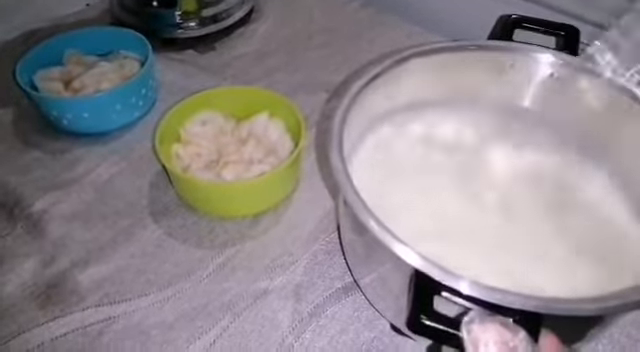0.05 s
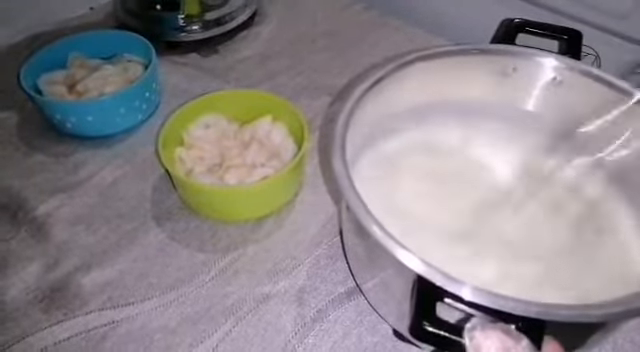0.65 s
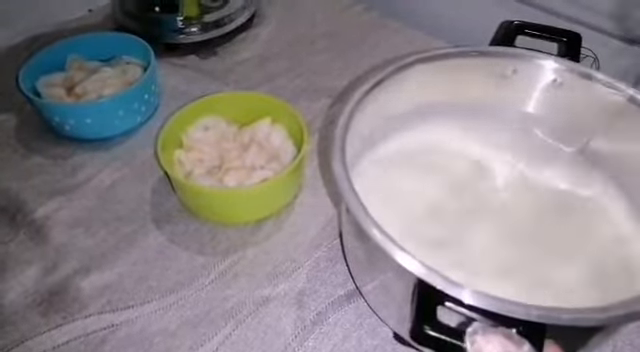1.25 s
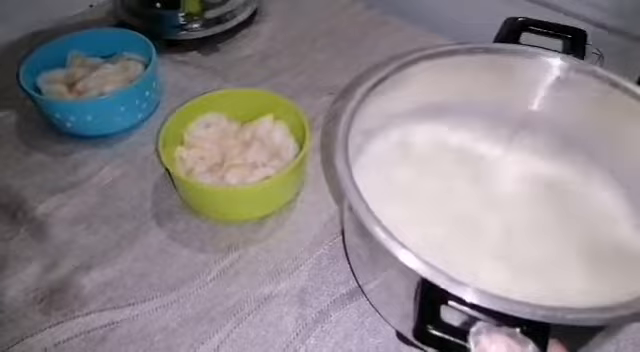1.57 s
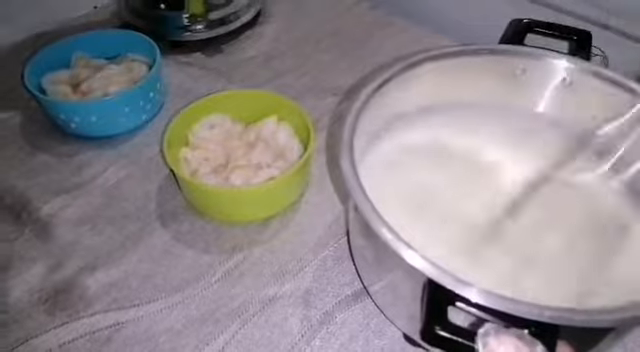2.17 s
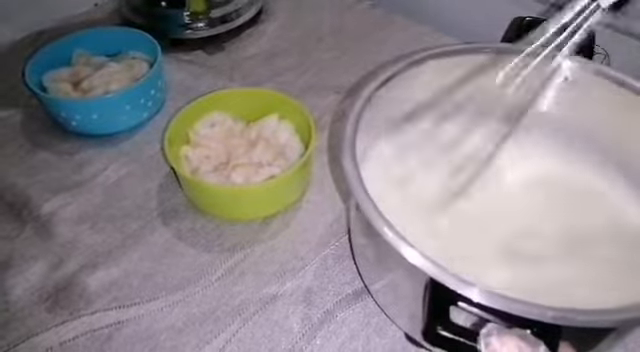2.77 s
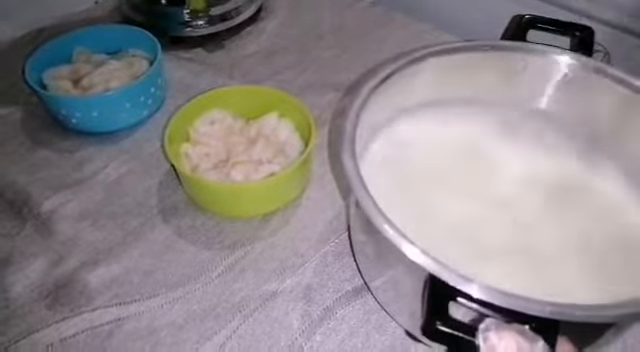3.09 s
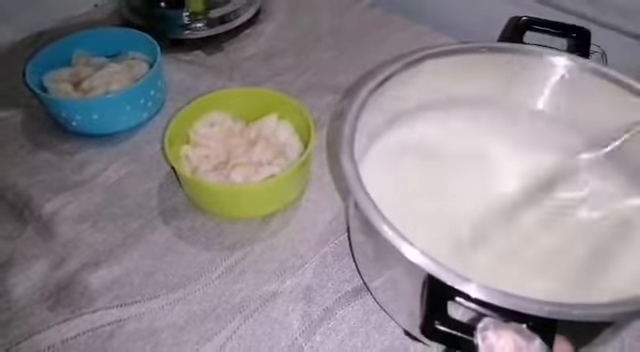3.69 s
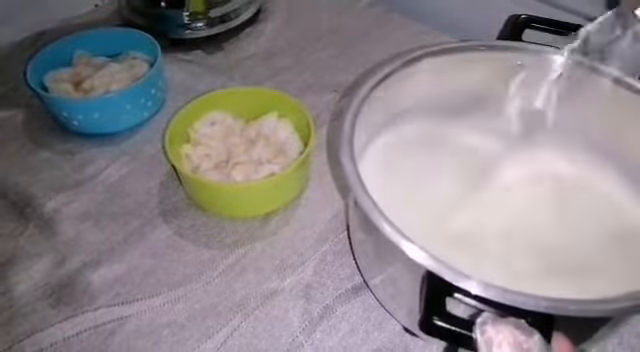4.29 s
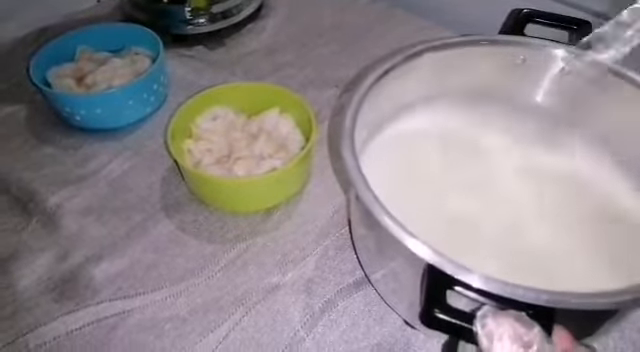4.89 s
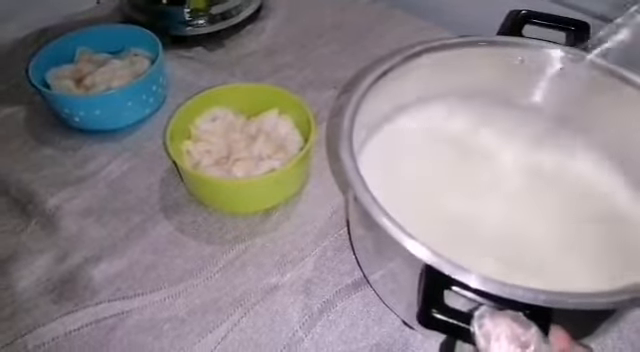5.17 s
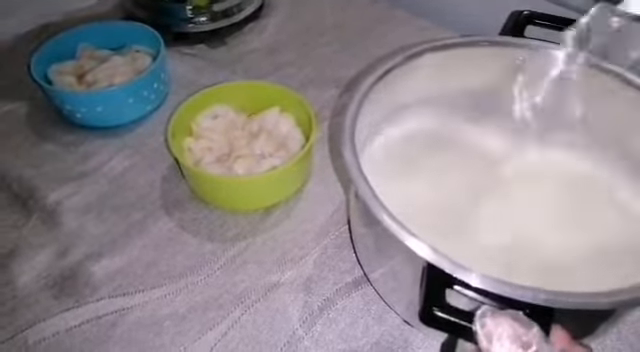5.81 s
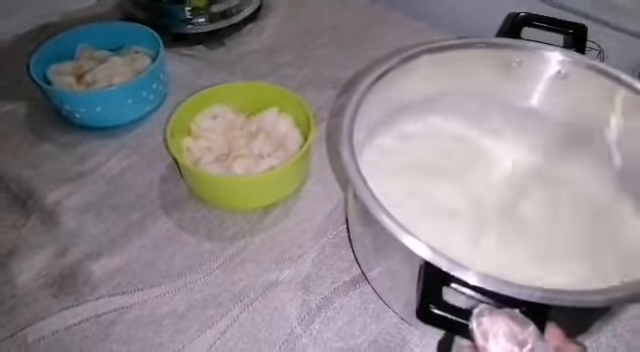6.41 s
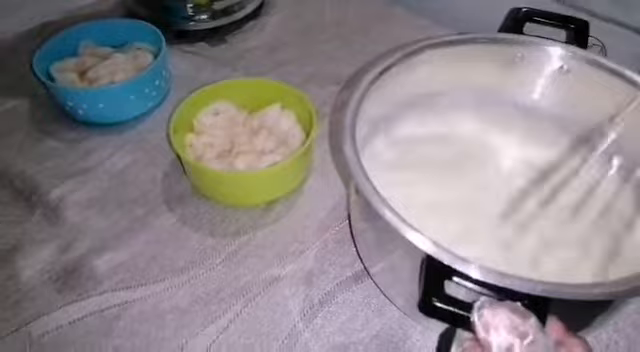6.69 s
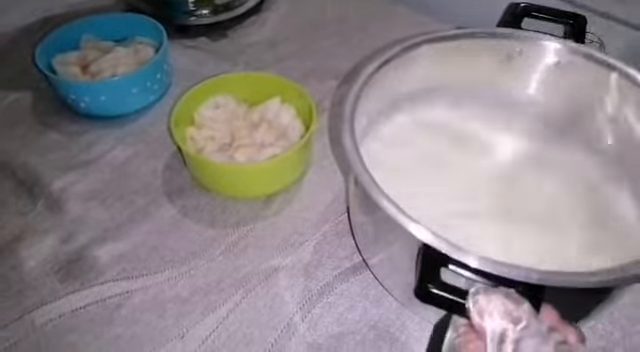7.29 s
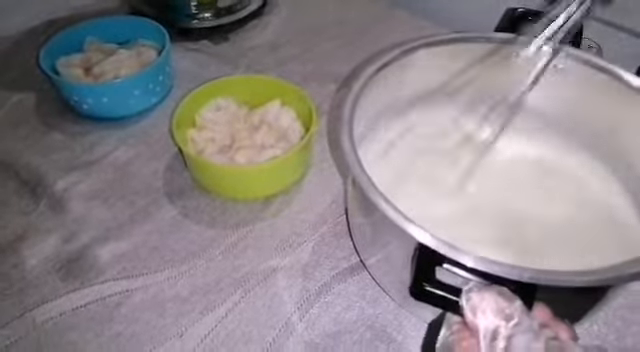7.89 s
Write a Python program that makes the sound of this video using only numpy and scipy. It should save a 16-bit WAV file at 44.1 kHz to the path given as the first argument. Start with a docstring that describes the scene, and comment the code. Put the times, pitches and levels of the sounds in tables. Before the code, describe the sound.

A wire whisk stirs milk in a steel pot throughout, heard close in a small kitchen over a faint appliance hum. It circles nearly four times a second. On each turn the wires brush the wall, then strike it in a tiny clatter, leaving a bright, short metallic ring, and a soft wave of milk follows with gurgles and little plops. The ticks are sharpest in the first 1.5 seconds, soften briefly near 2 seconds, then return in a steady rhythm. From about 3.5 seconds the milk gulps with a slightly deeper, hollow body, and around 5 seconds the strikes ease off for a moment. At about 6 seconds the wires scrape along the steel and the strokes grow uneven, with scattered clicks while the milk churns thickly. A last clatter comes at about 8 seconds.

```python
"""A wire whisk stirs milk in a steel pot, nearly four turns a second, in a small kitchen.
An appliance hums faintly throughout. In each turn the wires first brush the wall, then strike it one
after another, exciting the modes of wires and pot. While these ring on, the whisk drags a wave through
the milk, whose bubbles and air pockets resonate in the hollow of the pot. From about 3.5 s the body of
milk booms more strongly; after 6 s the strokes grow uneven and the milk churns thickly."""
import sys
import numpy as np
from scipy import signal
from scipy.fft import rfft, irfft
from scipy.io import wavfile
from scipy.ndimage import uniform_filter1d

SR = 44100
rng = np.random.default_rng(int(sys.argv[2]) if len(sys.argv) > 2 else 0)


def to_wav(s):
    """Save 16-bit WAV."""
    ch = np.atleast_2d(s).T  # columns
    pcm = np.round(np.clip(ch, -1, 1) * 32767)  # PCM
    wavfile.write(sys.argv[1], SR, pcm.astype(np.int16))


N = 355005
TIME = np.arange(N) / SR
BRUSH_LEAD_S = 0.019  # the wires brush the wall this long before each blow

# Levels in the tables are relative; the gains of the mix follow.
# Strokes of the whisk: t/s, blow level/dB, left minus right/dB, clatter length/s, knock re blow/dB,
# ping re blow/dB, lag of the wave/s, wave level/dB, gulp level/dB
STROKES = [(0.1637, -19, 1.5, 0.0034, 2.5, -2.5, 0.1, -43, -62.5),
           (0.413, -21.5, 0, 0.019, -20, -3, .11, -38, -52.5),
           (0.661, -19.5, 2, 0.0094, -33, -11, 0.11, -45, -59),
           (0.927, -21.5, 3.5, 0.012, -20, 1.5, 0.11, -44, -64),
           (1.211, -26.5, 6, 0.004, -22, 1, 0.078, -45.5, -62),
           (1.4572, -24.5, -1, 0.011, -17, -14, 0.075, -48.5, -69),
           (1.727, -43, 3, 0.0073, 0, -20, 0.05, -43, -60),
           (1.979, -51, 0, .0066, -14, -14, 0.061, -39.5, -58),
           (2.21, -27, -2.5, 0.032, 2, -20, 0.07, -38.5, -52.5),
           (2.4456, -25, -2, 0.023, -7, -22, 0.09, -39.5, -55.5),
           (2.687, -26, -2, 0.03, -4, -16, 0.091, -43, -65.5),
           (2.936, -27, 1.5, 0.042, -2, -18, 0.09, -43, -57),
           (3.203, -24, 2, 0.019, -4, -5, 0.091, -42, -73),
           (3.463, -29, 0.5, 0.035, -6, -12, 0.083, -40.5, -56),
           (3.732, -34.5, 6, 0.015, 1, -8, 0.075, -41, -60),
           (3.98, -26, 0, 0.016, -4, -7, 0.081, -41.5, -63),
           (4.2425, -27.5, 2.5, 0.018, -18, -10, 0.071, -42.5, -59.5),
           (4.4958, -23.5, 0, 0.019, -3, -20, 0.096, -44.5, -62),
           (4.7716, -28, 4, 0.0085, -10, -8, 0.073, -38.5, -58.5),
           (5.048, -42, 5, 0.0056, 9, -21, 0.067, -38, -57),
           (5.315, -50, 8, 0.0051, 13.5, -22, 0.052, -37.5, -53.5),
           (5.5588, -30, -0.5, 0.0096, 5.5, -16, 0.06, -38, -67),
           (5.781, -30, 0.5, 0.026, 0, -29, 0.1, -45, -73),
           (6.029, -26, 5, 0.012, -12, -13, 0.023, -37, -81),
           (6.178, -34, -14, 0.0076, 1, -6, 0.17, -43.5, -69),
           (6.378, -25, -1.5, 0.031, -19, -19, 0.033, -49, -63.5),
           (6.592, -59, 0, .008, -14, -14, 0.03, -41, -57.5),
           (6.673, -28.5, -5, 0.036, -23, 2, 0.0084, -37.5, -63),
           (6.964, -28, -5.5, 0.0067, -4, -5.5, 0.15, -50.5, -57.5),
           (7.241, -24.5, 1.5, 0.012, -19, -10, 0.16, -53, -65),
           (7.522, -34.5, -2, 0.016, -2, -20, 0.15, -77, -67),
           (7.7, -67, -2, .008, -14, -14, 0.054, -46.5, -63.5),
           (7.96, -73, -4, .008, -17, -12, 0.033, -49, -54.5),
           (8.012, -29, -3.5, .13, -20, -16, 0.034, -54, -56)]
# Wires sliding along the steel: middle t/s, length/s, level/dB
SCRAPES = [(0.01, 0.13, -45), (0.139, 0.061, -47.5), (1.274, 0.031, -46), (6.055, 0.035, -42),
           (6.175, 0.079, -42.5), (6.24, 0.024, -43.5), (6.402, 0.26, -56)]


def undb(db):
    """Amplitude ratio of a level in decibels."""
    return 10 ** (np.asarray(db) / 20)


def unit(x):
    """Normalisation to rms 1."""
    return x / np.sqrt(np.mean(x ** 2))


def fade(t, t60):
    """Exponential damping, 60 dB in t60 seconds."""
    return np.exp(-np.log(1000) * t / t60)


def add(track, s, sound):
    """Superposition of a sound on a track from time s."""
    i = max(int(s * SR), 0)
    room_left = max(N - i, 0)
    track[..., i:i + sound.shape[-1]] += sound[..., :room_left]


def panned(db, pan_db):
    """Level difference between the sides: gains for db + pan_db (left) and db - pan_db (right)."""
    return undb(db + pan_db * np.array([[1], [-1]]))


def through(x, response):
    """Convolution with an impulse response."""
    return signal.fftconvolve(np.atleast_2d(x), np.atleast_2d(response), axes=-1)[:, :N]


def colour(x, points, size=4096):
    """Minimum-phase filter of unit energy that follows points (f/Hz, level/dB)."""
    hz, db = np.transpose(points)
    grid = np.linspace(1, SR / 2, size // 2 + 1)
    cepstrum = irfft(np.log(undb(np.interp(np.log(grid), np.log(hz), db))))
    cepstrum[1:size // 2] *= 2
    cepstrum[size // 2 + 1:] = 0
    response = irfft(np.exp(rfft(cepstrum)))
    return through(x, response / np.linalg.norm(response))


def grit(spread_db):
    """Impulsive noise: tiny impacts of very uneven size, rms 1."""
    return unit(rng.standard_normal(N) * undb(spread_db * np.clip(rng.standard_normal(N), -2, 2)))


def pair(source, apart=1.0):
    """Partial coherence: two channels share one stream and each has a part of its own."""
    return unit(source() + apart * np.array([source(), source()]))


def swells(rows, skew=0.6):
    """Skewed Gaussian envelopes, quick to rise and slower to fall: rows (middle t/s, length/s, level/dB)."""
    t = TIME[::64]
    out = np.zeros(len(t))
    for s, length, db in rows:
        position = 2 * (t - s) / length + skew
        width = 1 + skew * np.sign(position)
        out += undb(db) * np.exp(-np.minimum((position / width) ** 2, 20))
    return np.interp(TIME, t, out)


def kitchen():
    """Background noise: broadband room air and the steady tones of an appliance."""
    # Spectrum of the room air: f/Hz, density level/dB
    air_spectrum = [(15, -49), (25, 1), (60, -9), (105, -0.5), (152, -4.5), (331, -9), (684, -25.5),
                    (1300, -33.5), (2300, -7), (6700, -23), (8810, -17), (11800, -38), (15500, -25.5)]
    # Appliance tones: f/Hz, rms level/dB
    hum_tones = [(120, -74.5), (177.5, -81)]
    air = colour(pair(lambda: rng.standard_normal(N)), air_spectrum)
    hum = sum(undb(db) * np.sqrt(2) * np.sin(2 * np.pi * hz * TIME) for hz, db in hum_tones)
    return undb(-67.0) * air + hum


def room(x, t60, wet_db):
    """Reverberation: reflections from pot, counter and near walls merge into a decaying tail."""
    t = np.arange(SR // 2) / SR
    tail = rng.standard_normal((2, len(t))) * fade(t, t60) * (1 - np.exp(-t / 0.00078))
    return x + undb(wet_db) * through(x, tail / np.linalg.norm(tail[0]))


def pot_cavity(x):
    """Cavity resonance: the air in the pot rings along with whatever sounds in it."""
    # Air modes of the open pot: f/Hz, level/dB, t60/s
    air_modes = [(637.4, 0.5, 0.33), (724, -2.5, 0.23), (1215, -1, 0.06), (2047, -5.5, 0.16)]
    t = np.arange(SR // 4) / SR
    response = np.zeros(len(t))
    for hz, db, t60 in air_modes:
        gain = undb(db) * 2 * np.log(1000) / (t60 * SR)  # db is the gain at resonance
        response += gain * fade(t, t60) * np.cos(2 * np.pi * hz * t)
    return x + through(x, response)


def bubble(hz, cycles, glide):
    """Bubble resonance: a damped air pocket whose pitch climbs as it nears the surface."""
    life = cycles / hz
    t = np.arange(int(life * SR) + 2) / SR
    tone = np.sin(2 * np.pi * hz * t * (1 + glide * t / life))
    return tone * fade(t, life) * (1 - np.exp(-t * hz / 2))


def froth(top_hz, cycles, spread_db, low_hz=485.0, pitches=48, count=130):
    """Incoherent sum of bubbles, count at each pitch, at random times; rms 1."""
    out = np.zeros(N)
    for hz in np.geomspace(low_hz, top_hz, pitches):
        blip = hz * bubble(hz, cycles, glide=0.065)
        when, loudness = rng.random((2, count))
        places = (when * N).astype(int)[:, None] + np.arange(len(blip))
        copies = np.outer(undb(spread_db * loudness), blip)
        out += np.bincount(places.ravel() % N, copies.ravel(), N)
    return unit(out)


def liquid(spectrum, spray_db, top_hz, cycles, spread_db):
    """Source and filter: bursting bubbles and fine spray, shaped by one spectrum."""
    bubbles = pair(lambda: froth(top_hz, cycles, spread_db), apart=0.47)
    spray = pair(lambda: grit(spread_db=10.0))
    return unit(colour(bubbles, spectrum)) + undb(spray_db) * colour(spray, spectrum)


def waves(longest_s=0.074, shortest_s=0.01774):
    """Displacement: a wave per stroke, shorter if it breaks early; rows (middle t/s, length/s, level/dB)."""
    return [(s + lag, min(longest_s, shortest_s + lag), db) for s, *_, lag, db, _ in STROKES]


def splash():
    """Air entrainment: each blow throws a spurt of milk, and each wave breaks into bubbles and spray."""
    # Milk splashing in the hollow of the pot: f/Hz, level/dB
    splash_spectrum = [(200, -8), (450, -9.5), (560, -5.5), (680, -3), (950, 1.5), (1220, 2), (1520, -4),
                       (1800, -7.5), (2600, -7.5), (4000, -6.5), (7000, -22), (10000, -16.5), (15000, -53)]
    spurts = [(s + 0.019, 0.044, db - 19.5) for s, db, *_ in STROKES]  # middle t/s, length/s, level/dB
    envelope = np.hypot(swells(waves()), swells(spurts))
    return envelope * liquid(splash_spectrum, spray_db=-5, top_hz=2680, cycles=19.7, spread_db=18.5)


def agitation(attack_s=0.0021, release_s=0.013, slap_db=-13, slap_s=0.0085):
    """Power addition of two envelopes: a slow swirl, and churns that slap, hold and die away."""
    # Milk swirling between the waves: t/s, level/dB
    swirl_levels = [(0.0, -63), (0.3, -54), (0.85, -64.5), (1.35, -57.5), (1.62, -60), (2.05, -67),
                    (2.4, -57.5), (2.85, -57), (3.4, -63.5), (3.65, -55), (4.15, -64.5), (5.28, -66.5),
                    (5.5, -61), (5.98, -61), (6.5, -53), (7.03, -62.5), (8.05, -60.5)]
    # The whisk ploughing through the milk: start t/s, length/s, level/dB
    churns = [(0.103, 0.051, -50), (0.371, 0.027, -49), (0.567, 0.096, -57), (0.727, 0.088, -52),
              (0.984, 0.12, -54), (1.134, 0.061, -49), (1.257, 0.05, -49), (1.401, 0.045, -46.5),
              (1.644, 0.18, -54), (1.842, 0.2, -54), (2.131, 0.069, -52.5), (5.827, 0.077, -60),
              (6.323, 0.11, -49.5), (6.477, 0.1, -52), (6.59, 0.066, -46), (6.801, 0.14, -50),
              (7.075, 0.16, -52), (7.363, 0.13, -52), (7.629, 0.13, -55), (7.963, 0.11, -47)]
    churning = np.zeros(N)
    t = np.arange(SR // 2) / SR
    onset = (1 - np.exp(-t / attack_s)) * (1 + undb(slap_db) * np.exp(-t / slap_s))
    for s, length, db in churns:
        release = np.exp(-np.maximum(t - length, 0) / release_s)
        add(churning, s, undb(db) * onset * release)
    return np.hypot(undb(np.interp(TIME, *np.transpose(swirl_levels))), churning)


def swirl(stirring):
    """Amplitude modulation: a thick crowd of bubbles follows the stirring in uneven lumps."""
    # The swirl, with the air resonances of the open pot: f/Hz, level/dB
    swirl_spectrum = [(200, -21), (420, 1.5), (540, -6.5), (660, -1), (750, -1), (950, -9), (1220, -0.5),
                      (1520, -9), (1780, -5), (2400, -12), (4000, -4.5), (7200, -10), (10000, -11),
                      (15000, -46)]
    slow_noise = uniform_filter1d(uniform_filter1d(rng.standard_normal(N), size=900), size=600)
    lumps = undb(1.5 * unit(slow_noise))
    gurgle = liquid(swirl_spectrum, spray_db=-9, top_hz=2600, cycles=18, spread_db=32)
    return stirring * lumps * gurgle


def blips(stirring, count=56, scatter_db=9, pan_db=4.0):
    """Single bubble resonances stand out on the left, as loud as the milk is stirred."""
    # Kinds of bursting air pocket: f/Hz, pitch scatter as a share, level re stirring/dB
    kinds = [(682, 0.11, 1), (1210, 0.12, 3), (2060, .2, -1)]
    out = np.zeros((2, N))
    for (hz, scatter, db), chances in zip(kinds, rng.random((len(kinds), count, 4))):
        for k, (when, size, force, side) in enumerate(chances):
            i = int((k + when) / count * N)
            gain = stirring[i] * panned(db - scatter_db * force, pan_db * (2 * side + 1))
            pitch = hz * (1 + scatter * (2 * size - 1))
            add(out, i / SR, gain * bubble(pitch, cycles=34, glide=0.11))
    return out


def glugs(rows, modes, scatter, glide, count=2):
    """Low resonances: count rising tone bursts per mode for each row (middle t/s, length/s, level/dB)."""
    out = np.zeros(N)
    t = np.arange(-SR // 12, SR // 12) / SR
    for (s, length, db), chances in zip(rows, 2 * rng.random((len(rows), len(modes), count, 3)) - 1):
        for (hz, mode_db, share), pockets in zip(modes, chances):
            for k, (detune, late, phase) in enumerate(pockets):
                cycles = hz * (1 + scatter * detune) * t * (1 + glide * t / length) + phase
                window = np.exp(-np.minimum((count * t / (share * length)) ** 2, 20))
                lag = share * length * ((2 * k + 1 + late) / count - 1)
                burst = undb(db + mode_db) * window * np.sin(2 * np.pi * cycles)
                add(out, max(s + t[0] + lag, 0), burst)
    return out


def gulps(boom_lag_s=0.0124):
    """Cavity collapse: the air pocket behind the whisk closes under each wave and rocks the whole pool."""
    # Air pockets of a gulp: f/Hz, level/dB, length as a share of the wave's
    pocket_modes = [(265, 0.5, 0.369), (423.5, 3, 0.55)]
    # The body of milk swinging in the pot: f/Hz, level/dB, length as a share of the wave's
    body_modes = [(103, -6.5, 0.51), (147.3, -2.5, 0.85), (168, -5, 0.453)]
    # Boom of that body under a gulp: t/s, level/dB
    boom_levels = [(0, 4.5), (2.3, 2.5), (3.1, -8), (3.6, 11), (5.1, 11), (5.4, -7), (5.7, 24), (6.3, -4),
                   (7.8, 8)]
    pockets = [(s, length, db) for (s, length, _), (*_, db) in zip(waves(), STROKES)]
    rocking = [(s + boom_lag_s, length, db + np.interp(s, *np.transpose(boom_levels)))
               for s, length, db in pockets]
    gulp = glugs(pockets, pocket_modes, scatter=0.065, glide=0.11)
    boom = glugs(rocking, body_modes, scatter=0.052, glide=0.025)
    return undb(-4.0) * gulp + undb(-9.5) * boom


def plops(pan_db=5.0, cycles=36.5, twin_ratio=1.3, twin_lag_s=0.00293, twin_db=-22):
    """Pitch rises as bubble size falls: each plop has a smaller, higher twin just behind it."""
    # Single bubbles plopping out of the milk: t/s, f/Hz, level/dB
    bubbles = [(0.141, 1256, -29.5), (0.242, 790, -36), (0.377, 1270, -35.5), (0.790, 1120, -34.5),
               (0.885, 1170, -40), (1.299, 1195, -39), (1.520, 1290, -42), (1.686, 664, -40),
               (2.172, 1200, -41.5), (2.775, 1200, -35.5), (3.966, 3150, -34), (4.576, 1240, -38.5),
               (5.293, 3570, -47), (5.308, 3080, -44), (5.483, 1340, -47.5), (6.366, 1090, -37),
               (6.596, 614, -38.5), (6.932, 1090, -41.5), (7.168, 1730, -44)]
    out = np.zeros((2, N))
    for (s, hz, db), side in zip(bubbles, rng.standard_normal(len(bubbles))):
        gain = panned(db, pan_db * side)
        add(out, s, gain * bubble(hz, cycles, glide=0.05))
        add(out, s + twin_lag_s, gain * undb(twin_db) * bubble(hz * twin_ratio, cycles, glide=0.036))
    return out


def milk():
    """Bubble sources in sum: splash, swirl and blips excite the air in the pot; gulps and plops join them."""
    stirring = agitation()
    surface = undb(-11.5) * splash() + undb(-8.0) * swirl(stirring)
    return gulps() + pot_cavity(surface + undb(0.5) * blips(stirring)) + plops()


def stick_slip(depth_db, size=150):
    """Stick-slip friction: a gain that jumps every few milliseconds as the wires catch, rms 1."""
    jitter = unit(uniform_filter1d(rng.standard_normal(N), size))
    return unit(undb(depth_db * np.clip(jitter, -2, 2)))


def friction(brush_s=0.053, brush_db=-59, drag_db=-13):
    """Friction noise: wires scrape the steel, brush it before each blow and drag through each wave."""
    brushes = [(s - BRUSH_LEAD_S, brush_s, brush_db) for s, *_ in STROKES]
    sliding = swells(SCRAPES + brushes) + undb(drag_db) * swells(waves())
    return sliding * stick_slip(depth_db=4.0) * pair(lambda: grit(spread_db=17.5))


def grazes(count=30, db=-50, scatter_db=3):
    """Random impacts of stray wires on the steel: rows (t/s, level/dB)."""
    return [(when * N / SR, db + scatter_db * (2 * force - 1)) for when, force in rng.random((count, 2))]


def chatter(count=4, above_db=2.5):
    """Intermittent contact: each scrape catches on the wall count times; rows (t/s, level/dB)."""
    return [(s + length * (when - 0.5), db + above_db)
            for (s, length, db), chance in zip(SCRAPES, rng.random((len(SCRAPES), count)))
            for when in chance]


def rebounds(count=5, lag_s=0.03, span_s=0.11, below_db=14.5, fall_db_per_s=135):
    """Elastic rebound: after a blow the loops tick together ever more faintly; rows (t/s, level/dB)."""
    return [(s + lag_s + late, db - below_db - fall_db_per_s * late)
            for (s, db, *_), chance in zip(STROKES, rng.random((len(STROKES), count)))
            for late in span_s * chance]


def clatter(count=4, gap_s=0.0095, jitter=0.12):
    """Multiple impact: count weaker wires follow the first; rows (t/s, level/dB, left minus right/dB)."""
    rows = []
    chances = rng.standard_normal((len(STROKES), count, 3))
    for (s, db, pan_db, length, *_), chance in zip(STROKES, chances):
        rows.append((s, db, pan_db))
        for k, (late, force, side) in enumerate(chance):
            delay = gap_s * (k + 1 + jitter * late)
            weaker_db = -2 - 5 * (delay / length) ** 2 + 0.7 * force
            rows.append((s + delay, db + weaker_db, pan_db + 2 * side))
    return rows


def contacts(rows, t60, rattle_db, rattle_t60):
    """Impact noise: a burst of wire contacts, then a weaker, uneven rattle as the loops spring back."""
    blow_power, rattle_power = np.zeros((2, 2, N))
    t = np.arange(SR // 5) / SR
    for s, db, pan_db in rows:
        rise = panned(db, pan_db / 2) * (1 - np.exp(-t / 0.0015))
        add(blow_power, s, (rise * fade(t, t60)) ** 2)
        add(rattle_power, s, (rise * fade(t, rattle_t60)) ** 2)
    rattle = undb(rattle_db) * np.sqrt(rattle_power) * stick_slip(depth_db=1.5)
    return (np.sqrt(blow_power) + rattle) * pair(lambda: grit(spread_db=1.0))


def clicks():
    """Heavily damped impacts: the ticks of single wires die at once."""
    # Single wires clicking: t/s, level/dB
    wire_clicks = [(0.169, -17.5), (0.666, -27), (0.693, -25.5), (0.738, -30.5), (0.934, -19.5),
                   (0.999, -28), (1.023, -30), (1.25, -27), (1.586, -29.5), (1.862, -36), (2.1115, -30),
                   (2.466, -26), (2.709, -32), (2.953, -33), (2.968, -33), (3.219, -23.5), (3.230, -26.5),
                   (4.515, -36), (5.696, -41.5), (6.032, -29), (6.179, -32), (6.223, -27.5), (6.243, -35),
                   (6.403, -36), (6.694, -25.5), (6.985, -29.5), (7.276, -38), (8.040, -22.5)]
    ticks = [(s, db, 0) for s, db in wire_clicks + grazes() + rebounds() + chatter()]
    return contacts(ticks, t60=0.016, rattle_db=-26.5, rattle_t60=0.031)


def tinks(rows, low_hz, high_hz, t60, count=6):
    """Free vibration: every blow catches other wires, which give a few brief tones of their own."""
    out = np.zeros((2, N))
    t = np.arange(SR // 12) / SR
    for (s, db, pan_db), chance in zip(rows, rng.random((len(rows), 3, count))):
        hz = low_hz * (high_hz / low_hz) ** chance[0]
        phase = chance[1:, :, None]
        tones = np.sin(2 * np.pi * (hz[:, None] * t + phase)).sum(axis=1) / np.sqrt(count)
        add(out, s, panned(db, pan_db / 2) * tones * fade(t, t60))
    return out


def circle(x, turn_hz, lag_s):
    """Arrival-time difference: as the whisk goes round, its sound reaches each side first in turn."""
    lag = np.round(lag_s * SR * np.sin(2 * np.pi * turn_hz * TIME)).astype(int)
    return np.array([x[0], x[1, np.clip(np.arange(N) + lag, 0, N - 1)]])


def steel(force):
    """Spectral shaping: the bright crack of wire on steel reaches each side with its own colour."""
    # Spectrum of a wire contact: f/Hz, left level/dB, right level/dB
    contact_spectrum = [(40, -16, -20), (487, -14, -9.5), (684, -14, -10.5), (880, -6.5, -12.5),
                        (1310, -4, -8), (2180, -10, -14), (3380, -16, -2), (3930, -6, -10), (5060, -1, -1),
                        (5640, 0.5, -4.5), (7400, -1.5, 9), (8400, 1.5, -11), (10180, -2, -10),
                        (11270, -9.5, -9), (14600, -17, -15)]
    points = np.array(contact_spectrum)
    return np.vstack([colour(force[k], points[:, [0, k + 1]]) for k in range(2)])


def wire_tuning(s):
    """Natural frequencies drift as the grip shifts and other wires meet the wall: ratio at time s."""
    # Pitch of the wires in contact: t/s, frequency ratio
    pitch_ratios = [(.4, 1), (1.5, 1.02), (2.4, 0.99), (6.1, 1.04), (7.25, .99)]
    return np.interp(s, *np.transpose(pitch_ratios))


def struck(rows, modes, detune, scatter_db, tuning=lambda s: 1):
    """Modal excitation: blows (t/s, level/dB) ring the modes in a new mix as the contact point moves."""
    out = np.zeros((2, N))
    t = np.arange(SR // 10) / SR
    hz, mode_db, t60 = np.transpose(modes)[..., None]
    for (s, db), chance in zip(rows, rng.standard_normal((len(rows), 4, len(modes), 1))):
        pitch = hz * tuning(s) * (1 + detune * chance[0])
        gain = undb(db + mode_db + scatter_db * chance[1])
        tones = np.sin(2 * np.pi * (pitch * t + chance[2:]))
        ring = (gain * fade(t, t60) * tones).sum(axis=1)
        add(out, s, ring * (1 - np.exp(-t / 0.0013)) / np.sqrt(len(modes)))
    return out


def loop_response(count=16, scatter_db=2.5):
    """Mode clusters: the nearly alike wire loops and the pot wall respond with close, beating partials."""
    # Clusters of whisk and pot: f/Hz, spread/Hz, level/dB, t60/s
    clusters = [(1225, 300, -1, 0.08), (2206, 750, -4.5, 0.16), (3213, 810, -3.5, 0.29),
                (4750, 820, -10, 0.23), (5360, 700, -13, 0.65), (7140, 600, -11, 0.9),
                (7180, 450, 3.5, 0.17), (8320, 560, -8, 0.43), (8570, 460, -0.5, 0.22),
                (14850, 560, -5, 0.16)]
    t = np.arange(SR // 2) / SR
    out = np.zeros((2, len(t)))
    for hz, spread, db, t60 in clusters:
        partials = hz + spread * ((np.arange(count) + rng.random(count)) / count - 0.5)
        lines = np.zeros((2, len(t) // 2 + 1), complex)
        lines[:, (partials * len(t) / SR).astype(int)] = np.exp(2j * np.pi * rng.random((2, count)))
        gain = undb(db + scatter_db * (2 * rng.random() - 1))
        out += gain * fade(t, t60) * irfft(lines, len(t))
    return out / np.linalg.norm(out[0])


def ringing(force, count=5, detune=0.01):
    """Forced response: each stroke drives one of count sets of wires, at a pitch of its own."""
    out = np.zeros((2, N))
    sets = [loop_response() for _ in range(count)]
    steps = np.arange(sets[0].shape[1])
    edges = [0] + [int((s - BRUSH_LEAD_S) * SR) for s, *_ in STROKES] + [N]
    for k, chance in enumerate(rng.standard_normal(len(edges) - 1)):
        start, end = edges[k:k + 2]
        tuning = wire_tuning(start / SR) * (1 + detune * chance)
        response = np.array([np.interp(steps * tuning, steps, side, right=0) for side in sets[k % count]])
        add(out, start / SR, through(force[:, start:end], response))
    return out


def whisk():
    """Impact and friction excite the steel: contacts crack, the wall knocks, the loops ping and ring on."""
    # Hard knock of the pot wall: f/Hz, level/dB, t60/s
    wall_modes = [(1202, -1.5, 0.041), (1920, -2, 0.017), (2452, -4.5, 0.049), (3085, -0.5, 0.033),
                  (3270, -22, 0.015), (4200, -10, 0.03)]
    # Bright ping of the wire loops: f/Hz, level/dB, t60/s
    wire_modes = [(5600, -6, 0.03), (6420, -7, 0.018), (7030, 4, 0.055), (7440, -11, 0.073),
                  (7840, -22, 0.045)]
    strikes = clatter()
    blows = contacts(strikes, t60=0.017, rattle_db=-15.0, rattle_t60=0.088)
    force = undb(-2) * blows + undb(-3.5) * friction()
    ticks = undb(1.5) * clicks()
    tones = undb(-10) * tinks(strikes, low_hz=2194, high_hz=10000, t60=0.04)
    crack = steel(circle(force + ticks, turn_hz=3.85, lag_s=0.00007) + tones)
    wall_hits = [(s, db + knock_db) for s, db, _, _, knock_db, *_ in STROKES] + chatter()
    wire_hits = [(s, db + ping_db) for s, db, _, _, _, ping_db, *_ in STROKES]
    knock = struck(wall_hits, wall_modes, detune=0.048, scatter_db=-1.0)
    ping = struck(wire_hits, wire_modes, detune=0.0204, scatter_db=2.0, tuning=wire_tuning)
    return crack + undb(-4.0) * knock + undb(2.0) * ping + undb(-6.5) * ringing(force)


def scene():
    """Superposition of whisk and milk, each with its reverberation, on the kitchen background."""
    metal = room(pot_cavity(whisk()), t60=0.42, wet_db=-7.0)
    sloshing = room(milk(), t60=0.23, wet_db=-4.5)
    return metal + sloshing + kitchen()


def record(dry):
    """Band limiting: a steep low-pass removes the treble above 15.4 kHz."""
    return signal.sosfilt(signal.ellip(8, 0.2, 70, 15400, fs=SR, output="sos"), dry)


dry = scene()
out = record(dry)
to_wav(out)
```